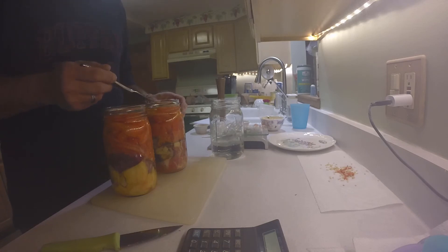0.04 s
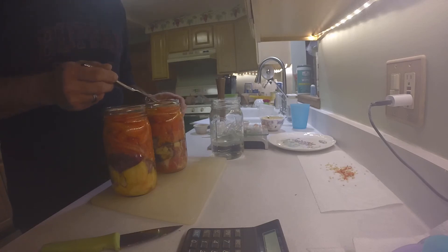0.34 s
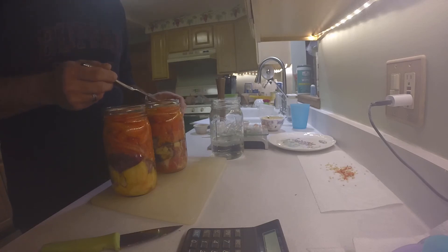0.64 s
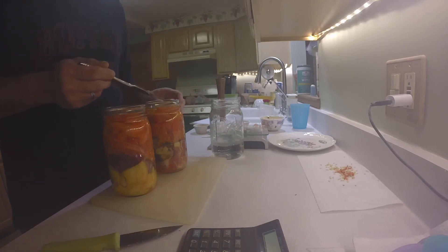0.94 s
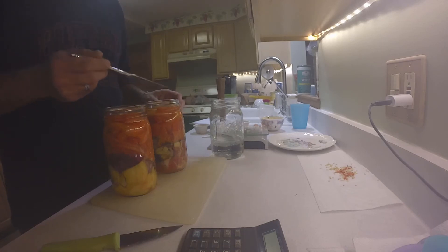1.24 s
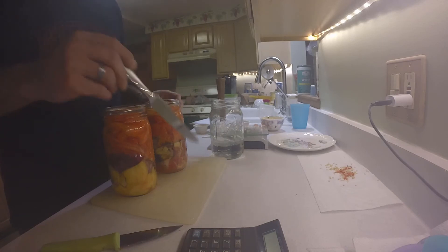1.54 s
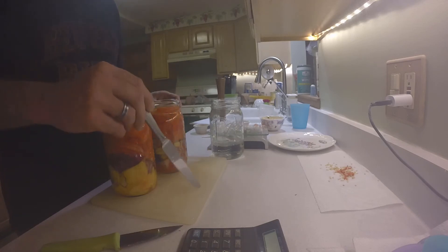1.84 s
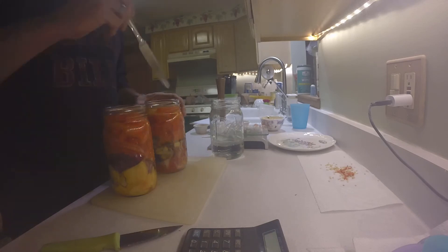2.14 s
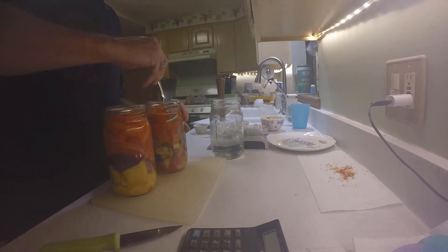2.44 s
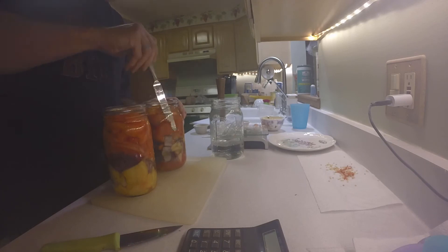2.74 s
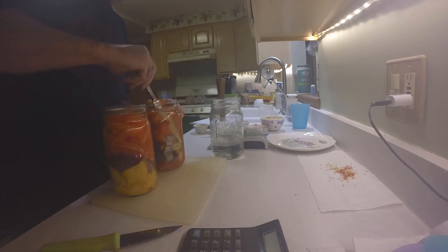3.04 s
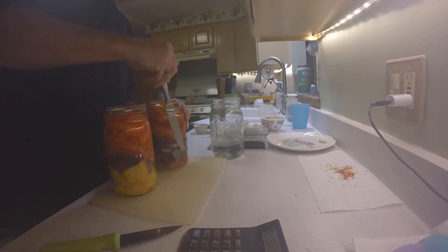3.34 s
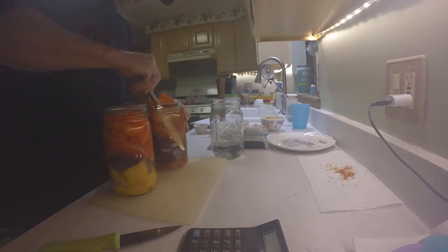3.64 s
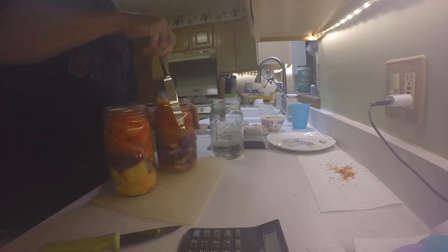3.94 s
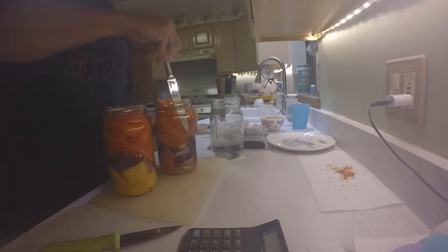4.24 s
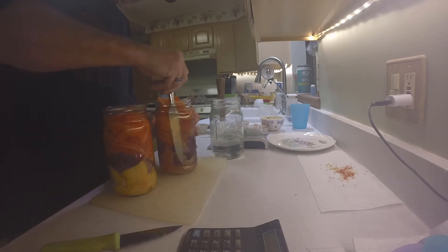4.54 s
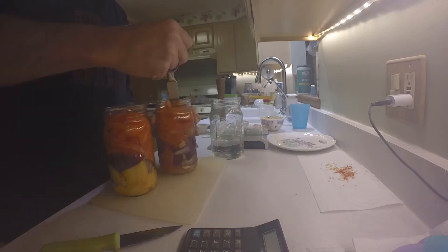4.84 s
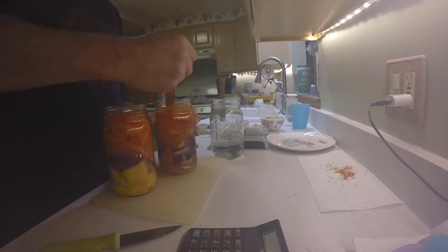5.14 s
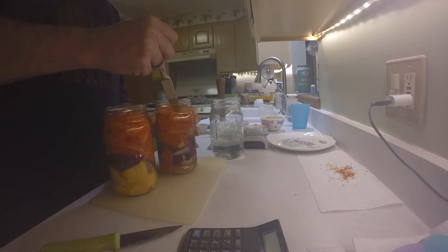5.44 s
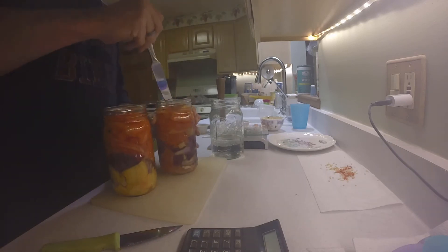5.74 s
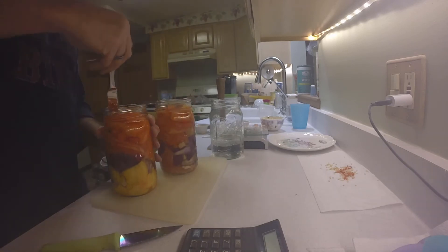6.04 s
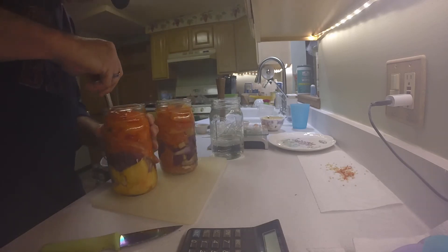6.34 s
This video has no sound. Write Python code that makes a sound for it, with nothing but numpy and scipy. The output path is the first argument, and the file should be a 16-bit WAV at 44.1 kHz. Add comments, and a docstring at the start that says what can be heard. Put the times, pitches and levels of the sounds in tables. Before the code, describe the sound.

In a kitchen, a table knife clinks lightly on the rim of a glass jar and drags faintly across it. A hard knock and a soft thud hit the counter. The blade then pushes through the packed contents with short rubbing groans, clicks and thin squeaks against the glass. The jar bumps on a cutting board at the end. Everything is close, over low background noise.

```python
"""Table knife in a packed glass jar

Over background noise, a knife clinks on the rim and drags lightly across it. The kitchen counter rings
with one hard knock and a soft thud. Then the blade is pushed down: it clicks on the glass, groans
through the contents by stick and slip, and squeaks along the wall. The jar bumps on the board
and trapped air ticks loose."""
import sys
import numpy as np
from scipy import signal
from scipy.fft import rfft, irfft
from scipy.io import wavfile
from scipy.ndimage import uniform_filter1d

SR = 44100
rng = np.random.default_rng(int(sys.argv[2]) if len(sys.argv) > 2 else 0)


def dump_mix(stems):
    """Bounce the given channels to the path in sys.argv[1] as a 16-bit WAV at rate SR."""
    frames = np.atleast_2d(stems).T  # one column per channel
    limited = np.clip(frames, -1, 1)  # hard clip at full scale
    pcm = np.round(limited * 32767).astype(np.int16)
    wavfile.write(sys.argv[1], SR, pcm)


N = 286650
TIME_S = np.arange(N) / SR

# Background rumble. Each row: frequency in Hz, relative density in dB.
RUMBLE_SPECTRUM = [(12, -48), (20, -8), (43, -6), (134, -6.5), (187, -12.5), (241, -10.5), (270, -17.5),
                   (399, -22), (485, -21), (607, -26), (1030, -27.5), (1120, -30.5), (7110, -46),
                   (14700, -59), (16000, -71)]
# Background hiss. Each row: frequency in Hz, relative density in dB.
HISS_SPECTRUM = [(18, -57), (30, -19), (98, -5.5), (170, -1.5), (194, 2), (252, -3), (364, -2), (437, -7),
                 (486, 1.5), (740, -9), (962, -7.5), (1220, -15.5), (3400, -23.5), (13700, -35),
                 (16000, -35)]
# Resonances in the hiss. Each row: centre in Hz, width in Hz, level in dB.
DRONES = [(205.3, 16, -57.5), (511, 220, -59.5), (985.6, 34, -63), (1930, 16, -71), (3370, 600, -68.5)]
# Knife bouncing on the rim. Each row: start in seconds, level in dB.
CLINKS = [(.4660, -46), (.4700, -43.5), (0.476, -58)]
# Drags over the rim. Each row: start and length in seconds, centre and width in Hz, level in dB.
DRAGS = [(0.919, 0.047, 2400, 1200, -67), (0.926, 0.076, 805, 300, -61), (0.959, 0.1, 1030, 160, -61)]
# Rim and knife ringing freely. Each row: frequency in Hz, relative gain in dB, T60 in seconds.
RIM_MODES = [(900, 7, 0.12), (990, -13, 0.16), (2500, 2, 0.04), (2700, -4, 0.044), (3310, -10, .08),
             (4420, -4, 0.055), (4576, -10, .08), (5540, 1.5, 0.042), (5690, 5, 0.043), (5810, -5, .1),
             (6020, -10, .05), (7994, -15, 0.1), (9141, -3, .05), (13300, -18, .04)]
# Kitchen reverberation. Each row: centre in Hz, relative gain in dB, T60 in seconds.
ROOM_BANDS = [(125, -5, 0.43), (263, -1.5, 0.25), (510, 0, 0.29), (1000, -15, 0.22), (2000, -0.5, 0.35),
              (3970, -0.5, 0.32), (8000, -1.5, 0.13)]
# Blows on the counter. Each row: start in seconds, gain in dB, contact time in seconds.
KNOCKS = [(1.7884, -6.5, .00019), (1.9628, -14, .0041)]
# Counter and what stands on it. Each row: frequency in Hz, relative gain in dB, T60 in seconds.
COUNTER_MODES = [(101, -5, 0.11), (126.8, 1, 0.19), (164, -3.5, 0.089), (222, -6.5, 0.19), (266, 5, 0.05),
                 (361.7, -8, 0.2), (460, -8.5, 0.067), (576, -5.5, .09), (705, -18, 0.056),
                 (747, -8.5, 0.067), (863, 1, 0.077), (968, -0.5, 0.076), (1017, -4.5, 0.077),
                 (1083, -2.5, 0.069), (1150, -6, 0.046), (1300, -26.5, .06), (1660, -5, 0.038),
                 (1876, -7, 0.04), (2560, -16.5, 0.052), (2800, -10.5, 0.044), (3480, -12.5, 0.022),
                 (4320, -12, 0.042), (5660, -13.5, 0.024)]
# Crack of a hard contact. Each row: frequency in Hz, relative density in dB.
CRACK_SPECTRUM = [(50, -6.5), (120, 4.5), (330, 3.5), (520, -10), (850, 0), (1150, -3.5), (1450, -20.5),
                  (2600, -14.5), (3700, -23.5), (5700, -22.5), (8000, -27), (16000, -35)]
# Blade hitting the wall. Each row: start in seconds, tick level in dB, glass level in dB.
CLICKS = [(2.2379, -39, -42), (2.674, -49, -43), (2.825, -52, -56), (3.37, -51, -55), (3.402, -53, -51),
          (4.2546, -35.5, -56), (4.530, -46, -45.5), (4.549, -50, -50), (4.6567, -40.5, -66),
          (4.8, -49, -44.5), (5.1206, -49, -44), (5.3215, -40, -35), (5.5003, -55, -60), (5.6115, -52, -41),
          (5.751, -38.5, -34), (6.0064, -35.5, -36.5), (6.0362, -34, -35), (6.076, -47, -43)]
# Steel on glass. Each row: frequency in Hz, relative density in dB.
TICK_SPECTRUM = [(500, -18), (2000, 0), (4200, -3), (6000, -9), (8500, 2), (11000, 2), (13500, -0.5),
                 (16500, -5)]
# Jar wall, damped by the contents. Each row: frequency in Hz, relative gain in dB, T60 in seconds.
WALL_MODES = [(1960, -37, .025), (2810, -1, .025), (3080, -2, 0.035), (3575, 1, 0.053), (3980, 7.5, 0.026),
              (4110, 1.5, 0.021), (4270, 4, 0.027), (4200, -43, .02)]
# Jar bumping the board. Each row: start in seconds, level in dB.
BUMPS = [(3.4019, -37), (3.538, -38), (6.2125, -29.5), (6.465, -28.5)]
# Hollow jar on the board. Each row: frequency in Hz, relative gain in dB, T60 in seconds.
BODY_MODES = [(223, -7, 0.1), (292, 0, 0.027), (437, -2.5, 0.059), (543, -0.5, 0.023), (656, -5, 0.035),
              (1007, -9.5, 0.014), (1380, -20, 0.047), (2060, -22, 0.0083)]
# Pushes through the contents. Each row: start and length in seconds, level in dB, relative grit in dB.
RUBS = [(2.630, 0.016, -31.5, -18), (2.646, .029, -22.5, -17), (2.682, 0.0089, -34, -22),
        (2.739, 0.03, -38, -17), (3.061, 0.062, -44, -24), (3.203, 0.053, -26.5, -15.5),
        (3.734, 0.051, -39, -15), (3.84, 0.0772, -32, -19), (4.068, 0.053, -40.5, -26),
        (4.368, 0.024, -39.5, -12), (6.187, 0.041, -40.5, -19)]
# Grit of a rub. Each row: frequency in Hz, relative density in dB.
GRIT_SPECTRUM = [(500, -0.5), (1350, -17), (1700, -6.5), (2600, -3), (2980, 4.5), (3200, 0), (3450, 5.5),
                 (3850, -3.5), (4300, 6.5), (4700, -5.5), (5400, -15.5), (10000, -15), (16000, -25)]
# Blade skidding on the wall. Each row: start and fall time in seconds, first and last pitch in Hz,
# squeak level in dB, hiss level in dB.
SCRAPES = [(3.876, 0.035, 1103, 1093, -40.5, -70), (4.330, 0.056, 3000, 3400, -58, -66),
           (4.376, .011, 2620, 2600, -41, -66), (5.138, 0.083, 1140, 1410, -52.5, -72),
           (5.323, 0.043, 3810, 4180, -38, -52), (5.374, 0.017, 3820, 3820, -47.5, -51),
           (5.621, 0.038, 3880, 4200, -42, -60), (5.638, .031, 1410, 1094, -49, -70),
           (5.672, .014, 4100, 4100, -52, -59), (5.749, .042, 2170, 3590, -41.5, -45.5),
           (5.782, 0.019, 3850, 3920, -41, -53), (5.801, .017, 3800, 3820, -45, -47.5),
           (6.187, .017, 3730, 3730, -52, -59)]


def undb(db):
    return 10 ** (np.asarray(db) / 20)


def unit_rms(x):
    return x / np.sqrt(np.mean(x ** 2) + 1e-18)


def add(out, start_s, x):
    i = int(start_s * SR)
    out[i:i + len(x)] += x[:N - i]


def bin_gains(spectrum, size):
    """FFT bin gains, interpolated over log frequency."""
    hz, db = np.transpose(spectrum)
    bins_hz = np.maximum(np.fft.rfftfreq(size, 1 / SR), 1)
    return undb(np.interp(np.log(bins_hz), np.log(hz), db))


def noise(spectrum, size):
    """Shaped noise, rms 1."""
    return unit_rms(irfft(rfft(rng.standard_normal(size)) * bin_gains(spectrum, size), size))


def band(hz, width_hz, size):
    """Noise in one resonance, rms 1."""
    offset = 2 * (np.fft.rfftfreq(size, 1 / SR) - hz) / width_hz
    return unit_rms(irfft(rfft(rng.standard_normal(size)) / (1 + offset ** 2), size))


def pulse(spectrum, size=2048):
    """Minimum-phase pulse, unit energy."""
    cepstrum = irfft(np.log(bin_gains(spectrum, size)))
    cepstrum[1:size // 2] *= 2
    cepstrum[size // 2:] = 0
    wave = irfft(np.exp(rfft(cepstrum)))
    return wave / np.sqrt(np.sum(wave ** 2))


def decay(t60_s, size):
    return np.exp(-np.log(1000) * TIME_S[:size] / t60_s)


def swell(rise_s, fall_s, size):
    return np.sin(np.pi / 2 * np.interp(TIME_S[:size], [0, rise_s, rise_s + fall_s], [0, 1, 0]))


def ring(modes, size, scatter_db=0, t60_scale=1, detune=0):
    """Struck modes, initial rms near 1; gain and pitch vary with the contact point."""
    hz, db, t60_s = np.transpose(modes)
    spread = rng.uniform(-0.99, 1, (len(hz), 2))
    gains = undb(db + scatter_db * spread[:, 0])
    hz = hz * (1 + detune * spread[:, 1])
    out = np.zeros(size)
    for k, gain in enumerate(gains):
        tone = np.sin(2 * np.pi * hz[k] * TIME_S[:size])
        out += (-1) ** k * gain * tone * decay(t60_s[k] * t60_scale, size)
    return out / np.sqrt(np.sum(gains ** 2) / 2)


def radiate(x, cutoff_hz):
    """A body of limited size radiates little bass."""
    return signal.sosfilt(signal.butter(2, cutoff_hz, "high", fs=SR, output="sos"), x)


def background_noise(switch_s=2.103, switch_length_s=0.004, level_db=-47.5, waver_db=0.5):
    """Low rumble that turns to thinner hiss with drones as the microphone switches."""
    hiss = undb(level_db) * noise(HISS_SPECTRUM, N)
    hiss += sum(undb(db) * band(hz, width_hz, N) for hz, width_hz, db in DRONES)
    rumble = undb(level_db) * noise(RUMBLE_SPECTRUM, N)
    hiss_share = np.clip((TIME_S - switch_s) / switch_length_s + 0.5, 0, 1)
    waver = undb(waver_db * band(hz=1, width_hz=18, size=N))
    return ((1 - hiss_share) * rumble + hiss_share * hiss) * waver


def rim_contacts(tick_db=-2, tick_t60_s=0.029, size=8192):
    """The knife bounces on the rim, ringing both, then drags over it."""
    out = np.zeros(N)
    for start_s, db in CLINKS:
        ringing = ring(RIM_MODES, size, detune=0.003)
        tick = band(hz=1800, width_hz=7000, size=size) * decay(tick_t60_s, size)
        add(out, start_s, undb(db) * (ringing + undb(tick_db) * tick))
    for start_s, length_s, hz, width_hz, db in DRAGS:
        pressure = swell(length_s / 2, length_s / 2, size)
        add(out, start_s, undb(db) * pressure * band(hz, width_hz, size))
    return out + kitchen_reverb(out, wet_db=-10)


def kitchen_reverb(x, wet_db, onset_s=0.0034, size=16384):
    """Diffuse reflections build up, then decay by octave band."""
    tail = sum(undb(db) * np.sqrt(hz) * band(hz, hz, size) * decay(t60_s, size)
               for hz, db, t60_s in ROOM_BANDS)
    tail *= np.clip(TIME_S[:size] / onset_s - 0.5, 0, 1)
    tail /= np.sqrt(np.sum(tail ** 2))
    return undb(wet_db) * signal.oaconvolve(x, tail)[:N]


def counter_knocks(crack_db=18, size=16384):
    """Blows ring the counter, soft ones only its low modes; the crack fills the room."""
    ringing, cracks = np.zeros(N), np.zeros(N)
    modes = -ring(COUNTER_MODES, size)
    crack = -undb(crack_db) * pulse(CRACK_SPECTRUM)
    for start_s, db, contact_s in KNOCKS:
        progress = TIME_S[:size // 16] / contact_s
        force = progress ** 2 * np.exp(-2 * np.pi * progress)
        force *= undb(db) / force.sum()
        add(ringing, start_s, signal.fftconvolve(modes, force))
        add(cracks, start_s, signal.fftconvolve(crack, force))
    return radiate(ringing + cracks + kitchen_reverb(cracks, wet_db=-5), cutoff_hz=75)


def blade_ring(t60_s, size, low_hz=7600, high_hz=13400, count=14):
    """Thin steel has many close high modes; each contact picks a random set."""
    modes = rng.uniform([low_hz, -8, 0.6 * t60_s], [high_hz, 0, 1.4 * t60_s], (count, 3))
    return ring(modes, size)


def glass_clicks(blade_db=-6, base_t60_s=0.027, glancing_s_per_db=0.0005, size=3072):
    """Steel hits glass; a glancing touch rings the wall less and the steel longer."""
    out = np.zeros(N)
    for start_s, tick_db, glass_db in CLICKS:
        tick_t60_s = base_t60_s + glancing_s_per_db * max(tick_db - glass_db, 0)
        tick = noise(TICK_SPECTRUM, size) * decay(tick_t60_s, size)
        steel = tick + undb(blade_db) * blade_ring(1.84 * tick_t60_s, size)
        wall = ring(WALL_MODES, size, scatter_db=4, t60_scale=0.95, detune=0.025)
        add(out, start_s, undb(tick_db) * steel + undb(glass_db) * wall)
    return out


def jar_bumps(nudge_db=-37.5, tap_db=-11, tap_t60_s=0.018, size=3072):
    """The jar taps the board and rings hollow; every click nudges it too."""
    out = np.zeros(N)
    nudges = [(start_s, nudge_db) for start_s, _, _ in CLICKS]
    for start_s, db in BUMPS + nudges:
        body = ring(BODY_MODES, size, scatter_db=2, detune=0.03)
        tap = band(hz=610, width_hz=1400, size=size) * decay(tap_t60_s, size)
        add(out, start_s, undb(db) * (body + undb(tap_db) * tap))
    return out


def air_bubbles(start_s=2.25, span_s=4.1, min_db=-61, centre_hz=10000, t60_s=0.032, count=22, size=2048):
    """Tiny wet ticks as trapped air works loose from the contents."""
    out = np.zeros(N)
    for when, pitch, strength in rng.random((count, 3)):
        octaves = 0.4 * (pitch - 0.5)
        tick = band(centre_hz * 2 ** octaves, width_hz=2200, size=size) * decay(t60_s, size)
        add(out, start_s + span_s * when, undb(min_db + 6 * strength) * tick)
    return out


def thrust(length_s, size, bite_s=0.0052, give_s=0.011):
    """Force of one push: the blade bites, holds, and the contents give."""
    bite = np.clip(TIME_S[:size] / bite_s, 0, 1)
    give = np.clip((length_s - TIME_S[:size]) / give_s, 0, 1)
    return np.sin(np.pi / 2 * bite * give)


def content_rubs(firm_db=-22, firm_hz=471.2, hz_per_db=2.5, scatter_db=2.5, size=5120, count=80):
    """Stick-slip drives the jar and sheds grit; lighter pushes slip faster and less evenly."""
    out = np.zeros(N)
    for start_s, length_s, db, grit_db in RUBS:
        slack_db = max(firm_db - db, 0)
        slip_hz = firm_hz + hz_per_db * slack_db
        jitter = 0.07 + 0.024 * slack_db
        gap_draws, strength_draws = rng.standard_normal((count, 2)).T
        slip_times_s = np.cumsum(np.exp(jitter * gap_draws)) / slip_hz
        slips = np.bincount((slip_times_s * SR).astype(int), undb(scatter_db * strength_draws), size)
        pressure = thrust(length_s, size)
        groan = signal.fftconvolve(slips[:size] * pressure, ring(BODY_MODES, size))[:size]
        slip_cycles = np.interp(TIME_S[:size], slip_times_s, np.arange(count))
        pulsing = 1 + 0.36 * np.cos(2 * np.pi * slip_cycles)
        grit = pressure * pulsing * noise(GRIT_SPECTRUM, size)
        rub = unit_rms(groan) + undb(grit_db) * unit_rms(grit)
        add(out, start_s, undb(db) * rub * np.sqrt(np.mean(pressure ** 2)))
    return out


def wall_scrapes(wall_hz=4080, min_width_hz=370, widen_hz_per_octave=330,
                 rasp_db=-10, chatter_db=6.5, blade_db=-2, size=4096):
    """The edge skids: the glass squeaks, purest at its own note; tiny catches shake the blade."""
    out = np.zeros(N)
    for start_s, fall_s, from_hz, to_hz, squeak_db, hiss_db in SCRAPES:
        pressure = swell(0.12 * fall_s, fall_s, size)
        roughness = unit_rms(uniform_filter1d(rng.standard_normal(size), size=90))
        catches = unit_rms(undb(chatter_db * roughness))
        friction = catches * pressure * noise(TICK_SPECTRUM, size)
        steel = signal.fftconvolve(friction, blade_ring(t60_s=0.017, size=size))[:size]
        hiss = unit_rms(friction) + undb(blade_db) * unit_rms(steel)
        width_hz = min_width_hz + widen_hz_per_octave * abs(np.log2(wall_hz / from_hz))
        note = band(from_hz, width_hz, size)
        rasp = undb(rasp_db) * band(from_hz, width_hz=2100, size=size)
        glide_hz = np.interp(TIME_S[:size], [0, fall_s], [0, to_hz - from_hz])
        shifter = np.exp(2j * np.pi * np.cumsum(glide_hz) / SR)
        squeak = pressure * np.real(signal.hilbert(note + rasp) * shifter)
        scrape = undb(squeak_db) * unit_rms(squeak) + undb(hiss_db) * hiss
        add(out, start_s, scrape * np.sqrt(np.mean(pressure ** 2)))
    return out


def scene():
    """Mono, within arm's reach; sounds inside the jar stay dry."""
    jar = glass_clicks() + wall_scrapes() + content_rubs() + jar_bumps() + air_bubbles()
    return (rim_contacts() + counter_knocks() + radiate(jar, cutoff_hz=156) + background_noise())[None]


def record(dry):
    """Full-scale clipping, then a steep low-pass."""
    cutoff_hz = 15900
    lowpass = signal.ellip(8, 0.2, 70, cutoff_hz, fs=SR, output="sos")
    return signal.sosfilt(lowpass, np.clip(dry, -1, 1))


dry = scene()
out = record(dry)
dump_mix(out)
```